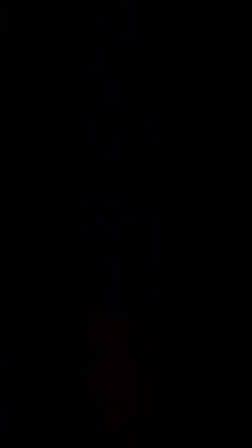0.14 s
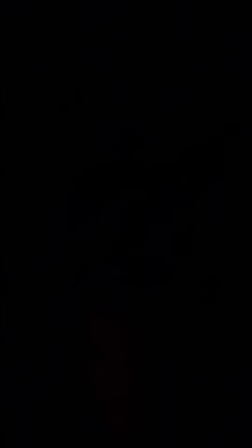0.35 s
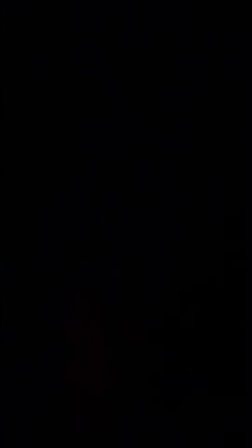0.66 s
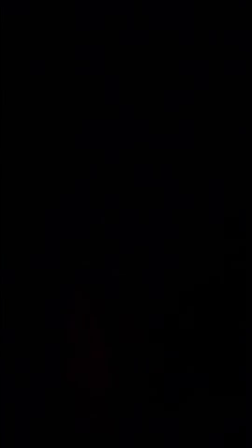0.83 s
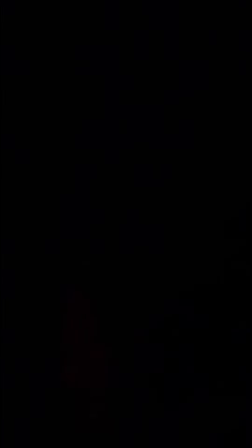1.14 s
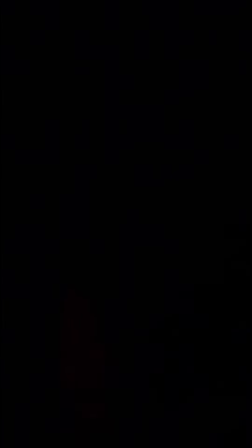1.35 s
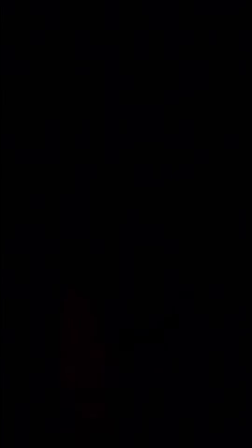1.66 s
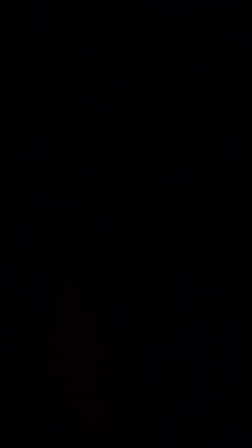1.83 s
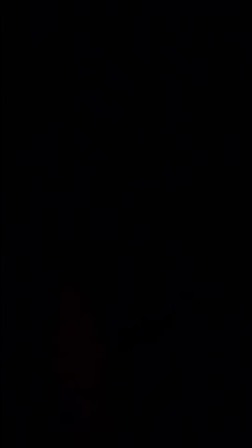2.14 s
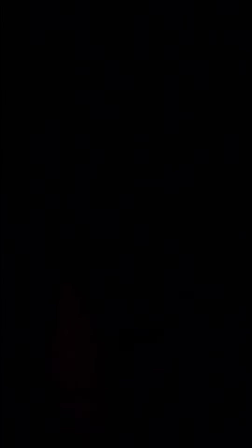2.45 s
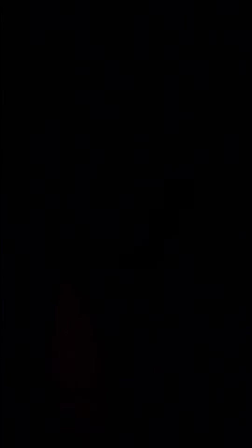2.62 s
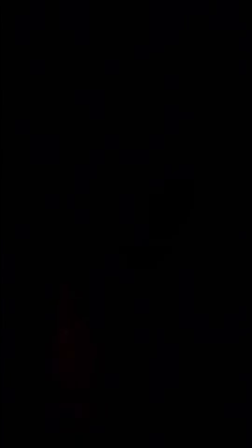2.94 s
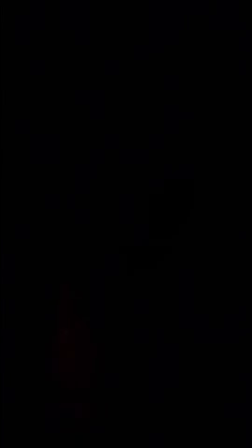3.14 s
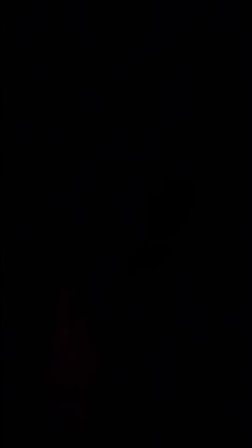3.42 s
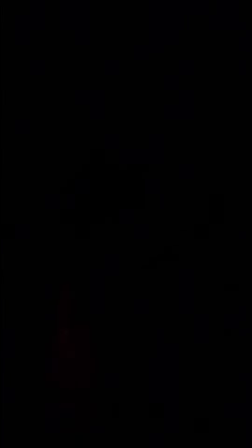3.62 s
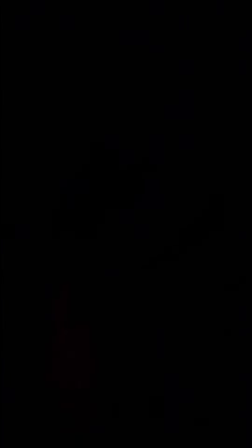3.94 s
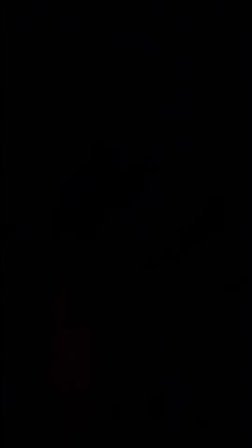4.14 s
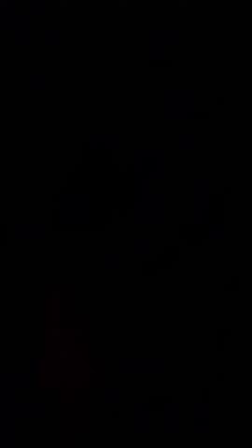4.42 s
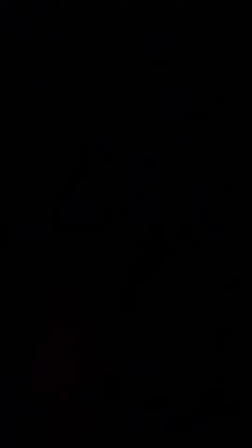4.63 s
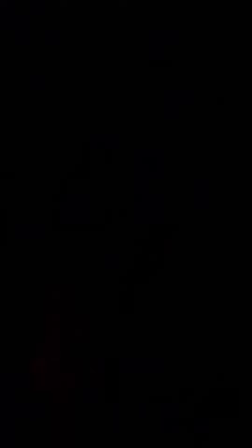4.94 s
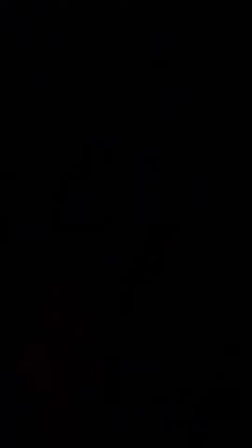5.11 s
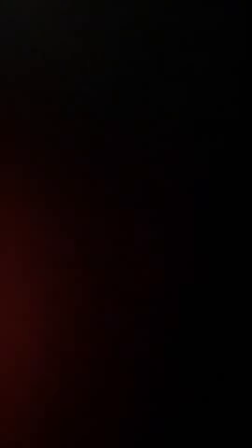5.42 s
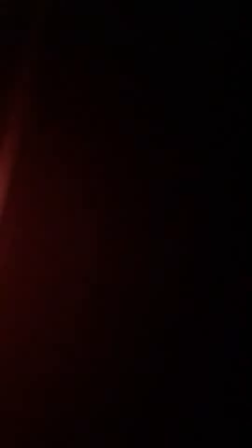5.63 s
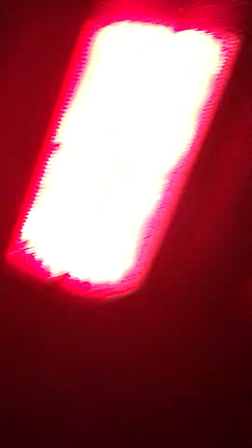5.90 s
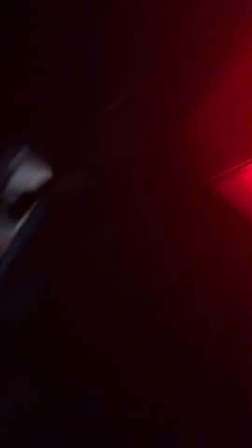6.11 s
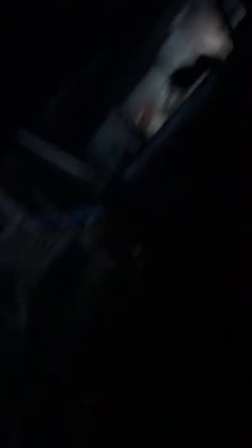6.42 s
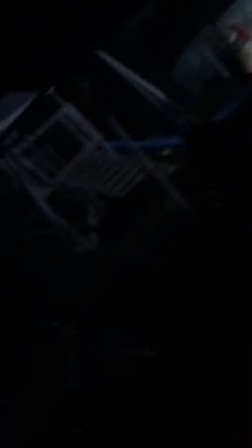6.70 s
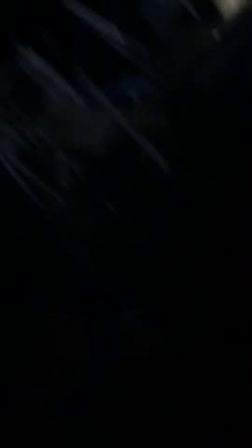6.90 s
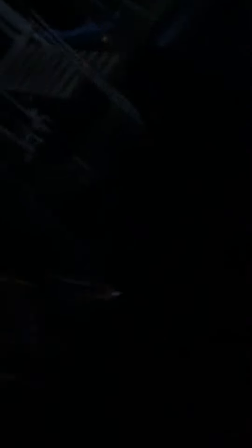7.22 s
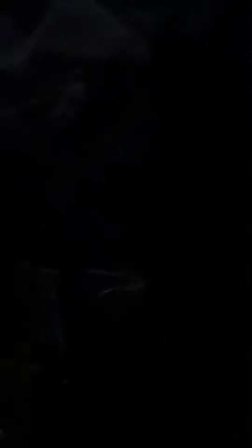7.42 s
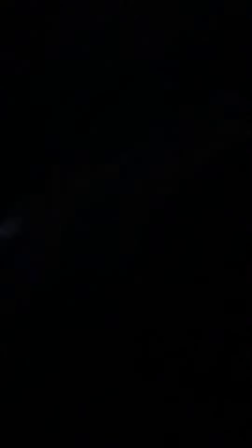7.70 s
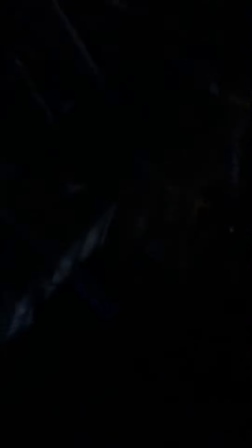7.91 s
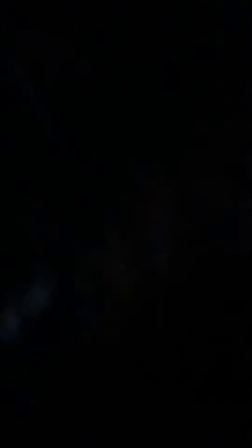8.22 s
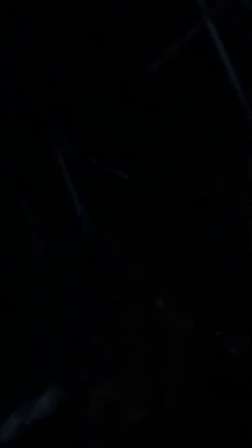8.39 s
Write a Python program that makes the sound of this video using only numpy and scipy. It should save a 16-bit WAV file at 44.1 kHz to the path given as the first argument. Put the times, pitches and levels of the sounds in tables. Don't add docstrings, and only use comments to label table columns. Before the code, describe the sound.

From 0 to about 5.2 seconds, a six-cylinder car idles very close to a handheld phone at the tailpipe, in a quiet night setting. The exhaust is a deep, fast, lumpy throb, its bass boom surging and easing while individual firings pop unevenly. Soft gas roar, faint valve ticking, a buzzing panel note and scattered dull knocks ride on top, the knocks stronger around 2.6 and 5.0 seconds. Between 5.2 and 5.9 seconds the phone turns away and the rumble drops clearly, becoming duller. Cloth rubs and gritty shoe snaps begin, thickest from 6.2 to 7.5 seconds, with a sharp one near 7.2. Broad, breathy engine-bay noise and brief low-mid hums emerge, swelling briefly around 7.1. The exhaust keeps receding, rises slightly near 8.4, then sinks again by the end at about 8.5 seconds, with faint hiss beneath.

```python
import sys
import numpy as np
from scipy import signal
from scipy.fft import rfft, irfft, next_fast_len
from scipy.io import wavfile
from scipy.ndimage import uniform_filter1d

SR = 44100
rng = np.random.default_rng(int(sys.argv[2]) if len(sys.argv) > 2 else 0)


def master_out(mix):
    frames = np.transpose(np.atleast_2d(mix))
    ceiling = np.clip(frames, -1, 1)
    pcm = np.round(ceiling * 32767).astype(np.int16)
    wavfile.write(sys.argv[1], SR, pcm)


def natural_amplitude(level_db):
    exponent = np.asarray(level_db, float) / 20
    return 10 ** exponent


N = 377055
TIME = np.arange(N) / SR

# pop_db, panel_db, tick_db, crack_db
CYLINDERS = [(-5, -14, -8, -4), (1, -8, 3, 3), (-7, -9, -1, -3), (3, 5, -1, 1), (-4, 2, -5, -3),
             (3, -16, -7, 2)]
TURN_S, TURN_LENGTH_S = 5.2, 0.54


def curves(table):
    s, *columns = np.transpose(table)
    return [np.interp(TIME, s, c) for c in columns]


def ramp(start_s, length_s):
    return np.clip((TIME - start_s) / length_s, 0, 1)


def unit(x):
    return x / np.sqrt(np.mean(x ** 2))


def ring(x, hz, t60):
    pole = np.exp(2j * np.pi * hz / SR - np.log(1000) / (t60 * SR))
    return signal.lfilter([1], [1, -pole], x).real


def resonances(x, modes):
    return sum(natural_amplitude(db) * signal.lfilter(*signal.iirpeak(hz, hz / w, SR), x) for hz, w, db in modes)


def coloured(points):
    hz, db = np.transpose(points)
    size = next_fast_len(N)
    f = np.fft.rfftfreq(size, 1 / SR) + 1
    gain = natural_amplitude(np.interp(np.log(f), np.log(hz), db))
    return unit(irfft(rfft(rng.standard_normal(size)) * gain, size)[:N])


def walk(rate):
    k = int(SR / rate)
    steps = np.repeat(rng.standard_normal(N // k + 1), k)
    return unit(uniform_filter1d(steps, k)[:N])


def hiss():
    # hz, density_db
    hiss_spectrum = [(2060, -32), (3500, -3), (4970, -9.5), (6150, 1), (7950, -2.5), (9300, 1), (10400, -2),
                     (14500, 1), (15600, -8)]
    return natural_amplitude(-72 + 0.42 * walk(5.3)) * coloured(hiss_spectrum)


def rustle():
    # middle_s, length_s, level_db
    sweeps = [(5.427, 0.0092, -64.5), (5.776, .2, -69.5), (5.975, .02, -57.5), (6.05, 0.054, -74),
              (6.219, .07, -65.5), (6.362, .04, -62.5), (6.416, .03, -60), (6.52, .035, -59),
              (6.693, 0.088, -66), (6.83, .04, -69.5), (6.935, .03, -61), (7.199, 0.13, -55.5),
              (7.407, .05, -65.5), (7.473, .045, -56), (7.636, .1, -64), (7.894, 0.028, -68.5),
              (8.123, 0.21, -66), (8.418, 0.12, -64.5)]
    # hz, density_db
    cloth_spectrum = [(2500, -13.5), (4800, -12.5), (5900, -4), (7800, -7.5), (9700, -6.5), (11500, -5.5),
                      (13600, -2.5), (15600, -6.5), (16500, -30.5)]
    # start_s, peak_db
    grit = [(5.6945, -47), (5.968, -56.5), (6.2415, -40.5), (6.3321, -43.5), (6.371, -36.5), (6.515, -40.5),
            (6.6824, -46), (6.9274, -41), (7.098, -39), (7.1595, -38), (7.2129, -32.5), (7.3745, -37.5),
            (7.4293, -51.5), (7.4716, -49.5), (7.963, -60.5), (8.0263, -43.5)]
    swell = natural_amplitude(-73.5) * ramp(TURN_S, .3)
    for s, length, db in sweeps:
        swell = swell + natural_amplitude(db) * np.exp(-(1.6 * (TIME - s) / length) ** 2)
    cloth = coloured(cloth_spectrum)
    cloth = cloth + 1.2 * resonances(cloth, [(9600, 1100, -1), (13600, 1400, -5)])
    s, db = np.transpose(grit)
    hits = np.zeros(N)
    hits[(s * SR).astype(int)] = natural_amplitude(db)
    tail = np.exp(-np.arange(200) / (.0009 * SR)) * cloth[:200]
    return swell * unit(cloth * natural_amplitude(2 * walk(350))) + natural_amplitude(-12.5) * np.convolve(hits, tail)[:N]


def bay():
    # hz, density_db
    bay_spectrum = [(150, -38.5), (260, -4), (325, -5.5), (352, -12.5), (428, 1), (501, -13.5), (627, -3.5),
                    (870, -19.5), (1020, -2.5), (1840, -21), (2210, -15), (4860, -32.5), (6000, -30.5),
                    (7800, -51), (13200, -120)]
    # middle_s, length_s, pitch_hz, level_db
    hums = [(7.15, 0.11, 428, -50), (7.29, .14, 428, -50), (7.46, .12, 420, -52), (6.2, 0.16, 417, -52),
            (7.757, 0.091, 425, -46), (7.924, 0.15, 422, -47.5), (8.15, 0.36, 425, -56),
            (6.72, 0.12, 1020, -55), (6.3, .08, 1010, -54), (6.86, .12, 425, -53)]
    glance_db = 4.5 * np.exp(-((TIME - 7.12) / 0.11) ** 2)
    facing = ramp(7.16, 1)
    level_db = -59.5 + 5.5 * ramp(TURN_S + 0.093, TURN_LENGTH_S) + 2.2 * facing + glance_db
    noise = coloured(bay_spectrum) * natural_amplitude(2.0 * walk(150))
    patches = sum(.3 * walk(14) * resonances(noise, [(hz, hz / 4, 0)])
                  for hz in (500, 750, 1050, 1500, 2300, 3200))
    bright = 0.76 * facing * resonances(noise, [(2890, 1600, 0)])
    out = natural_amplitude(level_db) * (noise + patches + bright)
    for s, length, hz, db in hums:
        out = out + natural_amplitude(db) * np.exp(-(3.3 * (TIME - s) / length) ** 2) * np.sin(2 * np.pi * hz * TIME)
    return out


def crank():
    # start_s, firing_hz
    speed = [(0.0, 38.62), (0.66, 37.19), (0.97, 37.9), (1.59, 37.49), (2.37, 38.23), (2.81, 36.28),
             (3.2, 36.29), (3.7, 38.32), (4.3, 36.96), (4.49, 37.19), (4.77, 38.62), (5.53, 37.0),
             (6.3, 37.97), (6.6, 37.66), (6.92, 38.14), (7.39, 36.36), (8.0, 37.99), (8.55, 38.37)]
    hz, = curves(speed)
    fast = hz - 37.5
    boom_count = np.cumsum(hz) / SR - .01
    return boom_count, boom_count - .3 + .07 * fast, fast


def puffs(count, column, lag, length, scatter_db, smooth_s):
    late = count - lag
    firing = np.floor(late).astype(int)
    size_db = np.array(CYLINDERS)[firing % 6, column] + scatter_db * rng.standard_normal(400)[firing + 2]
    burst = natural_amplitude(size_db) * np.exp(-((late - firing) / length) ** 2)
    return uniform_filter1d(burst, int(smooth_s * SR))


def ticks(count, level_db):
    # hz, width_hz, level_db
    hard_parts = [(6330, 400, -5), (9500, 210, -1.5), (11400, 550, -1.5), (12800, 900, -7.5),
                  (14600, 550, 2)]
    shared = puffs(count, column=2, lag=.45, length=.44, scatter_db=1.5, smooth_s=.003)
    out = 0
    for hz, width, db in hard_parts:
        tap = (.07 + shared) * natural_amplitude(2 * walk(30))
        part = resonances(rng.standard_normal(N) * tap, [(hz, width, db)])
        out = out + resonances(part, [(hz, 2 * width, 0)])
    return natural_amplitude(level_db) * unit(out)


def gear(count, level_db):
    # hz, width_hz, level_db
    body_modes = [(350, 150, 6.5), (471, 69, 5), (691.5, 140, 4.5), (865, 61, 8.5), (1205, 130, 1.5),
                  (1276.4, 50, 5.5), (1626, 58, 0.5), (1901, 74, -5), (2150, 43, -4.5), (2520, 300, -8.5),
                  (2794, 64, -8), (3178, 84, -10), (4130, 130, -22.5)]
    out, noise = 0, rng.standard_normal(N)
    for k, (hz, width, db) in enumerate(body_modes):
        breath = .6 + puffs(count + k, column=2, lag=.1 * k, length=.7, scatter_db=2, smooth_s=.004)
        mode = resonances(noise * breath, [(hz, width, db)])
        out = out + resonances(mode, [(hz, 1.6 * width, 0)])
    near_db = np.interp(TIME, [5.15, 5.5], [0, -6.])
    return natural_amplitude(level_db + near_db + 5.5) * unit(out)


def panel(count, level_db):
    note = np.cos(2 * np.pi * np.cumsum(786 + 8 * walk(30)) / SR)
    drive = puffs(count, column=1, lag=-.1, length=1.1, scatter_db=1.5, smooth_s=.008)
    knock = puffs(count, column=3, lag=0, length=0.37, scatter_db=0.0, smooth_s=.002)
    rattle = resonances(rng.standard_normal(N) * knock, [(764, 120, 0)])
    rattle = resonances(rattle, [(744, 180, 0)])
    tone = unit(note * drive * natural_amplitude(0.51 * walk(51)))
    return natural_amplitude(level_db - 4.0) * tone + natural_amplitude(level_db - 5.5) * unit(rattle)


def knocks():
    # start_s, peak_db, thud_db relative to the ring
    blows = [(0.033, -40, -6), (0.088, -40, -4), (0.165, -37, -7), (0.246, -38, -5), (0.562, -31, 0),
             (0.67, -43, -11), (0.829, -37, -4.5), (1.146, -40, -5), (1.201, -43, -8.5), (1.518, -43, 3),
             (1.679, -37, -8.5), (2.417, -39.5, -5), (2.472, -35, -12), (2.577, -25.5, -22),
             (2.632, -27, -3.5), (2.795, -30, -2.5), (2.907, -33, -0.5), (2.961, -37, 10.5),
             (3.237, -41.5, 12), (3.898, -31, -12), (4.194, -34, 3.5), (4.355, -42, -9), (4.41, -41.5, 0.5),
             (4.516, -40, -6), (4.674, -29.5, -16), (4.831, -40.5, -2), (4.886, -38, 0),
             (5.013, -24.5, -18), (5.093, -37, 2), (5.279, -35, -5)]
    s, db, thud_db = np.transpose(blows)
    high, low = np.zeros((2, N))
    at = (s * SR).astype(int) + 20
    high[at], low[at] = natural_amplitude(db), natural_amplitude(db + thud_db)
    blow = ring(high, 800, 0.011) + natural_amplitude(-5.0) * ring(high, 550, 0.013) + ring(low, 460, 0.049)
    soft = np.hanning(40)
    return natural_amplitude(-0.5) * np.convolve(blow, soft / soft.sum(), "same")


def partials(count, level_db):
    # multiple, level_db relative to the pops, lead_turns
    harmonics = [(3, -11.5, 0.36), (4, -14.5, 0.071), (5, -5, 0.12), (6, -12, 0.0023)]
    out = 0
    for k, db, lead in harmonics:
        level = natural_amplitude(level_db + db + 0.91 * walk(4))
        out = out + np.sqrt(2) * level * np.cos(2 * np.pi * (k * count + lead))
    return out


def boom(count, away_db, bump_db):
    # middle_s, length_s, boom_db, thump_db
    surges = [(0.283, .08, -1, 4.5), (0.6, .26, 5, -6), (1.138, 0.14, 1.5, -6.5), (1.349, 0.16, 3.5, -2.5),
              (1.59, .08, 0.5, -3.5), (1.8, 0.068, 5.5, -1.5), (2.194, .07, -2.5, 7), (2.685, 0.35, 6, -5),
              (3.016, 0.36, 5, -2.5), (3.323, .25, 5, -10), (3.574, 0.085, -3, -10), (3.696, 0.14, 4, -11),
              (3.828, .08, -5, -3), (4.058, 0.19, 4.5, -8), (4.302, 0.26, 5.5, -3.5), (4.736, .07, -4, -9),
              (4.907, 0.056, -3, 2), (5.003, 0.058, 1.5, -2.5), (5.143, 0.19, 3.5, -9),
              (5.375, 0.054, 1, 2), (5.764, 0.37, 4, -2), (6.694, 0.073, 2.5, -8), (6.916, 0.25, -2, 1.5),
              (7.304, 0.35, 5.5, -9), (7.708, .46, 4, -18), (8.064, 0.099, -9, -7), (8.197, .14, -2, -17),
              (8.31, .08, -5, -10), (8.404, 0.13, -8.5, -17), (8.509, 0.1, 2, -13)]
    edge_s, uneven_db = .06, .6
    s, length, *gains = np.transpose(surges)
    held = np.array([ramp(m - (n + edge_s) / 2, edge_s) - ramp(m + (n - edge_s) / 2, edge_s)
                     for m, n in zip(s, length)])
    boom_db = -17 + .8 * away_db + gains[0] @ held
    boom_db = boom_db + uneven_db * natural_amplitude(0.1 * away_db) * walk(14)
    thump_db = -23.5 + 0.76 * away_db + gains[1] @ held + 1.26 * bump_db
    thump_db = thump_db + 4.1 * uneven_db * natural_amplitude(.4 * away_db) * walk(20)
    twice = natural_amplitude(boom_db) * np.cos(2 * np.pi * (2 * count + .36))
    once = natural_amplitude(thump_db) * np.cos(2 * np.pi * (count - .42))
    return np.sqrt(2) * (twice + once)


def firing_pushes(count, level_db):
    # start_s, peak_db
    single_pops = [(0.085, -11.5), (0.615, -6), (0.882, -9.5), (1.093, -8), (1.199, -8.5), (1.252, -9.5),
                   (1.358, -8), (1.518, -10), (1.572, -7), (1.704, -9), (1.891, -9.5), (2.207, -6.5),
                   (2.364, -6.5), (2.523, -7.5), (2.657, -7), (3.016, -8.5), (3.208, -11), (3.236, -10),
                   (3.451, -14), (3.925, -8.5), (4.085, -7.5), (4.274, -9), (4.882, -8.5), (4.986, -10),
                   (5.092, -4.5), (5.198, -8), (5.413, -12.5), (5.574, -17.5), (5.681, -15.5), (7.139, -18)]
    firing = np.arange(1, int(count[-1]) + 1)
    at = np.searchsorted(count, firing)
    scatter_db = 1.5 * rng.standard_normal(len(at))
    size_db = np.array(CYLINDERS)[firing % 6, 0] + scatter_db
    size_db = level_db[at] + 5.0 + np.minimum(size_db, 3.5)
    size_db += 2.5 * ramp(TURN_S, 0.4)[at] * (firing % 2)
    for s, db in single_pops:
        size_db[np.argmin(np.abs(at / SR - s))] = db
    return firing % 6, at, size_db


def pipe_ring(at, size_db):
    # hz, t60_s, level_db
    pipe_modes = [(37.2, 0.48, -21.5), (62.7, 0.94, -9), (66, 0.37, -21), (112.8, 0.63, -28.5),
                  (127.5, 0.69, -4), (161, 0.3, -16.5), (175, 0.28, 0.5), (189.55, 0.21, -7),
                  (187, 0.025, -11.5), (220.3, 0.26, -12)]
    out = 0
    for hz, t60, db in pipe_modes:
        colour_db = 1.2 * rng.standard_normal(len(at))
        slip = .17 * rng.standard_normal(len(at))
        push = np.zeros(N, complex)
        push[at] = natural_amplitude(size_db + db + colour_db) * np.exp(1j * slip)
        out = out + ring(push, hz, t60)
    muffler = signal.cheby1(6, .5, 248, fs=SR, output="sos")
    out = signal.sosfilt(muffler, np.append(out, np.zeros(150)))[126:N + 126]
    return out - .7 * ramp(TURN_S, 0.33) * resonances(out, [(263, 68, 0.0019)])


def muffler_roar(push, level_db, away_db):
    # hz, width_hz, level_db
    chambers = [(50, 27, -8.5), (94.6, 22, -2), (124.8, 46, -9), (178.9, 33.3, -0.5), (208.2, 39, -1.5),
                (256.3, 21, -13.5), (285.6, 25, -5.5), (337, 120, -24.5)]
    churn = rng.standard_normal(N) * (.9 * ring(push, 0, t60=0.11) + natural_amplitude(level_db - 5.0))
    out = 0
    for hz, width, db in chambers:
        chamber = resonances(resonances(churn, [(hz, width, db)]), [(hz, width, 0)])
        out = out + natural_amplitude(away_db * (hz > 240)) * chamber
    return out


def pops(count, level_db):
    cylinder, at, size_db = firing_pushes(count, level_db)
    push = np.zeros(N)
    push[at] = natural_amplitude(size_db)
    away_db = np.interp(TIME, [5.25, 5.6], [0, -8.])
    roar = muffler_roar(push, level_db, away_db)
    flare = resonances(np.roll(push, 130), [(301, 35, 0)])
    flare = resonances(flare, [(305, 37, 0)]) * natural_amplitude(away_db)
    crack_db = np.array(CYLINDERS)[cylinder, 3] + 3 * rng.standard_normal(len(at))
    push[at] *= natural_amplitude(crack_db)
    crack = resonances(np.convolve(push, np.hanning(50), "same"), [(430, 250, 0), (750, 300, -6)])
    crack = resonances(crack, [(520, 500, 0)])
    return natural_amplitude(-3.5) * pipe_ring(at, size_db) + natural_amplitude(14.) * roar + natural_amplitude(21.) * flare + natural_amplitude(-27.5) * crack


def scene():
    # start_s, gain_db
    away = [
        (0, 0.5),
        (5.2, -1),
        (5.47, -5.5),
        (5.9, -9.5),
        (7.0, -15),
        (7.6, -15),
        (8.0, -16.5),
        (8.4, -12.5),
        (8.55, -20),
    ]
    boom_count, count, fast = crank()
    away_db, = curves(away)
    bump_db = 11 * (1 - ramp(0, 0.014))
    pop_db = -20 + 1.8 * fast * (1 - ramp(TURN_S, TURN_LENGTH_S)) + away_db
    hidden_s = 5.9
    panel_db = -46.5 + 2.5 * fast + bump_db
    panel_db = panel_db - 9 * ramp(hidden_s, 0.036) - 5 * np.maximum(TIME - hidden_s, 0)
    gear_db = -52 + 1.5 * fast - 1.5 * ramp(3.0, 0.23) + 0.31 * bump_db
    tick_db = -73 + 1.8 * fast - 8 * ramp(5.2, 0.48)
    machinery = bay() + ticks(count, tick_db) + gear(count, gear_db) + panel(count, panel_db)
    exhaust = knocks() + partials(count, pop_db) + boom(boom_count, away_db, bump_db) + pops(count, pop_db)
    return (hiss() + rustle() + machinery + exhaust)[None]


def band_limit(x):
    return signal.sosfilt(signal.butter(12, 15780, fs=SR, output="sos"), x)


def record(dry):
    x = signal.sosfilt(signal.butter(2, 15, "high", fs=SR, output="sos"), dry)
    x = x / (1 + np.abs(x) ** 10) ** (1 / 10)
    return band_limit(x)


dry = scene()
out = record(dry)
master_out(out)
```